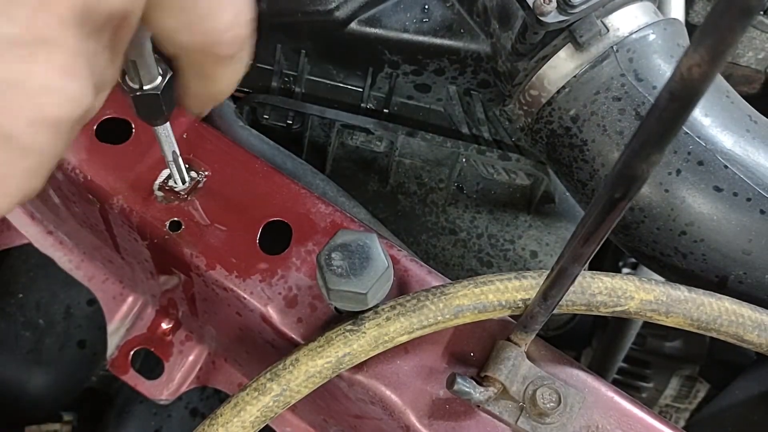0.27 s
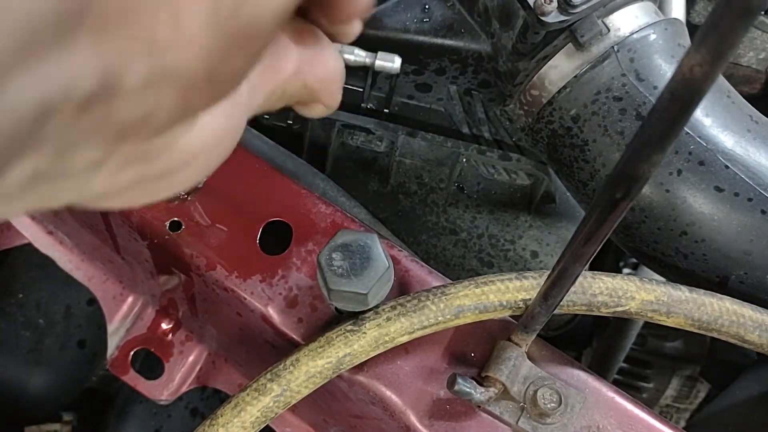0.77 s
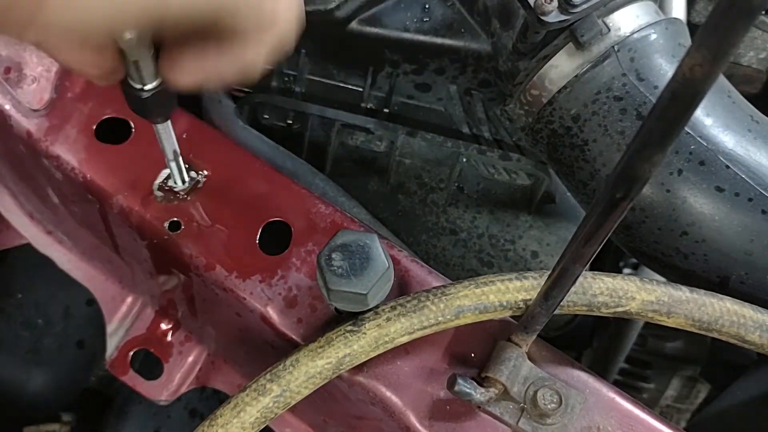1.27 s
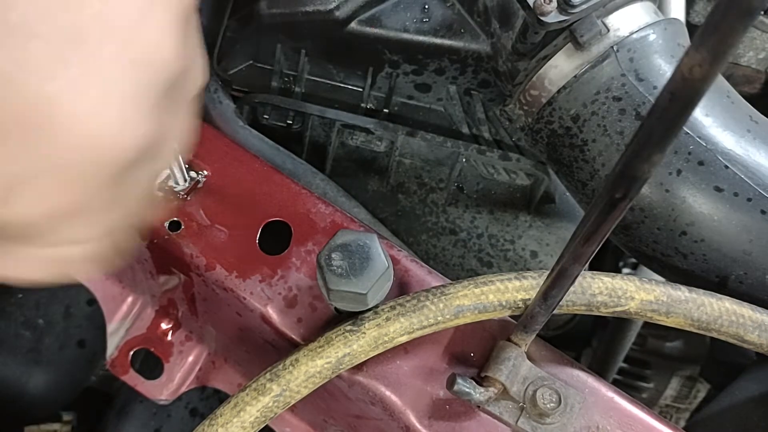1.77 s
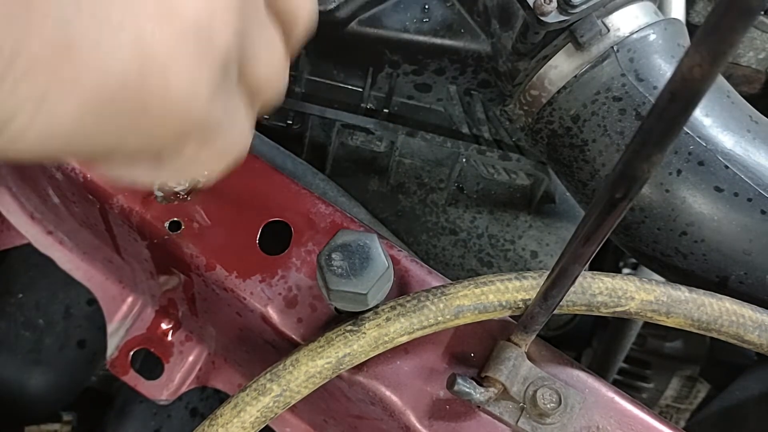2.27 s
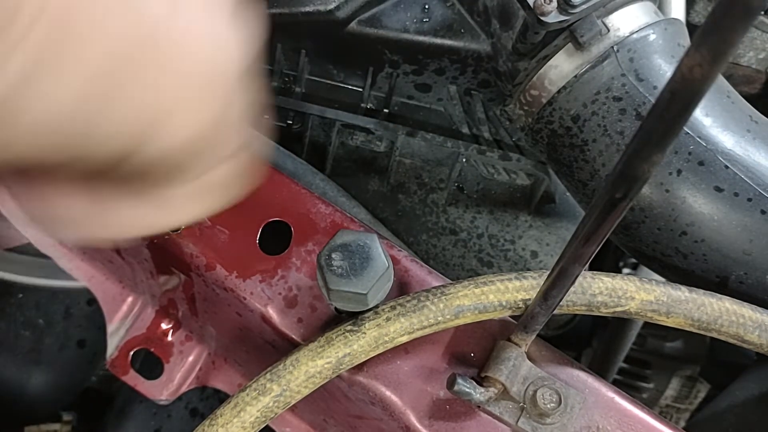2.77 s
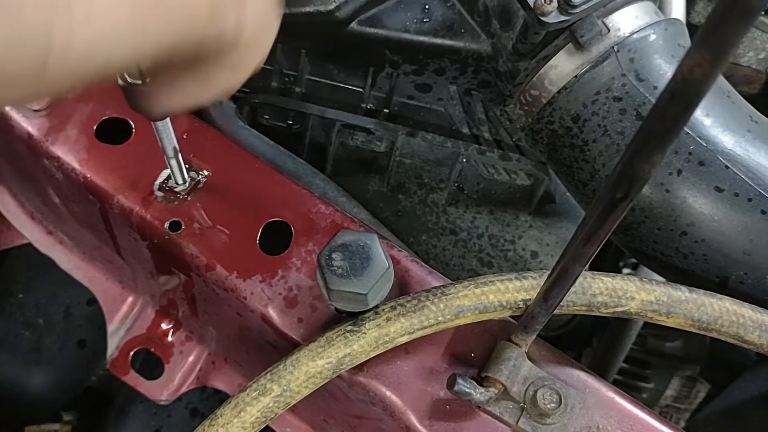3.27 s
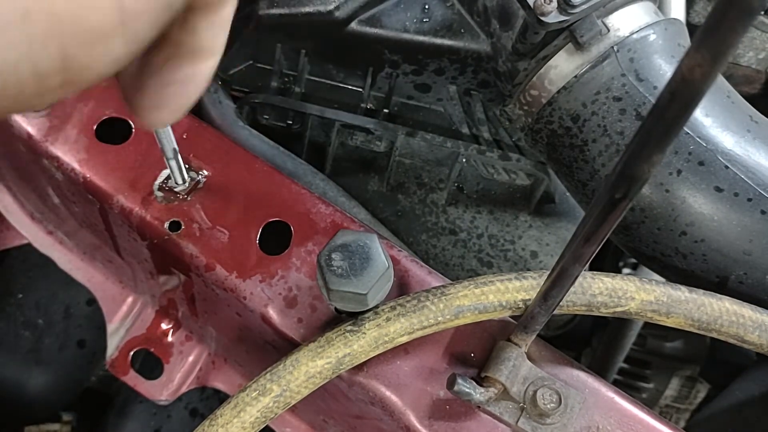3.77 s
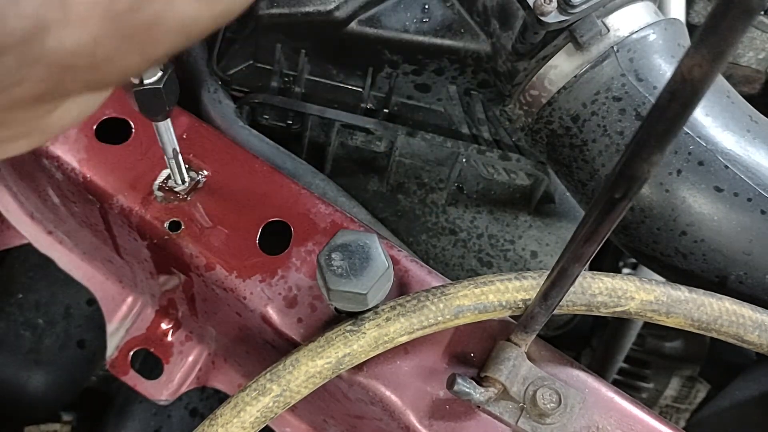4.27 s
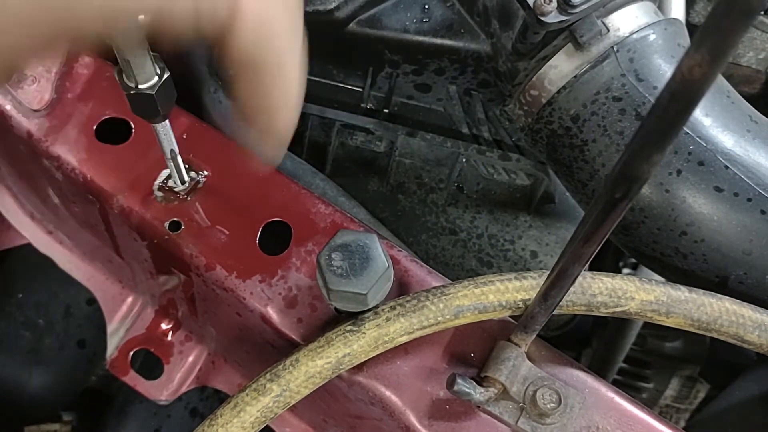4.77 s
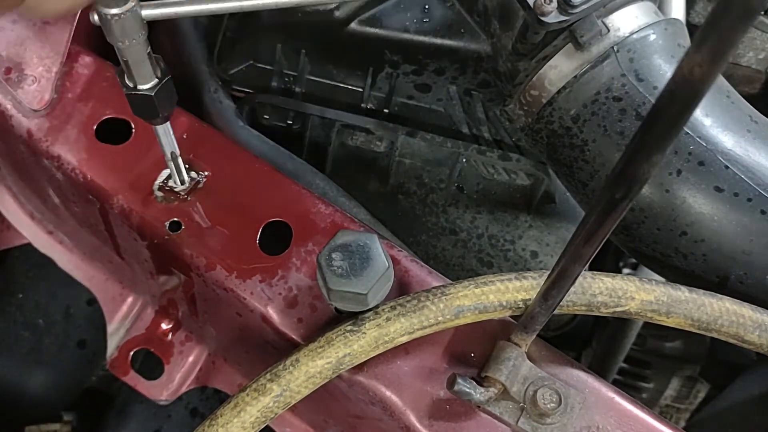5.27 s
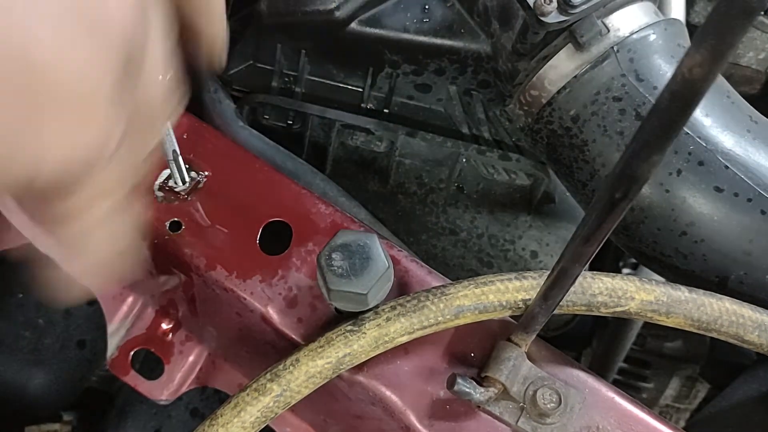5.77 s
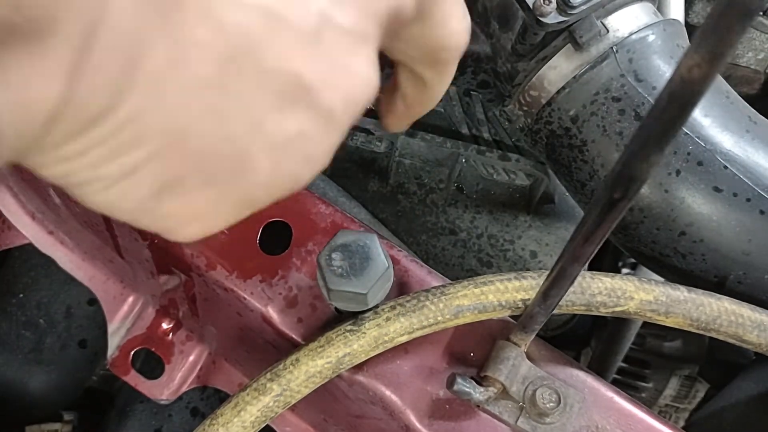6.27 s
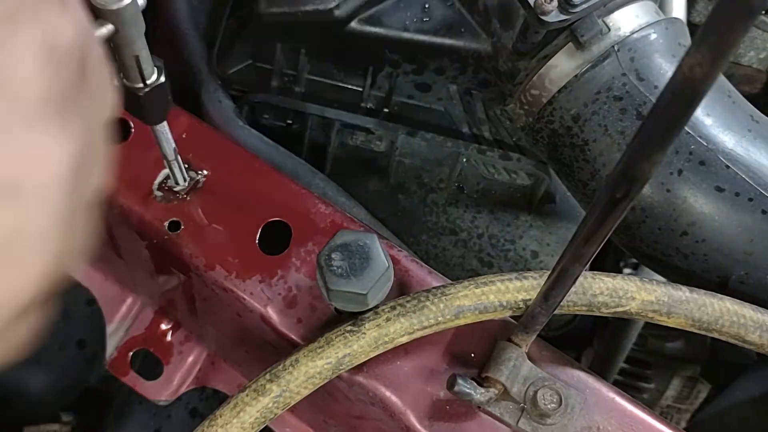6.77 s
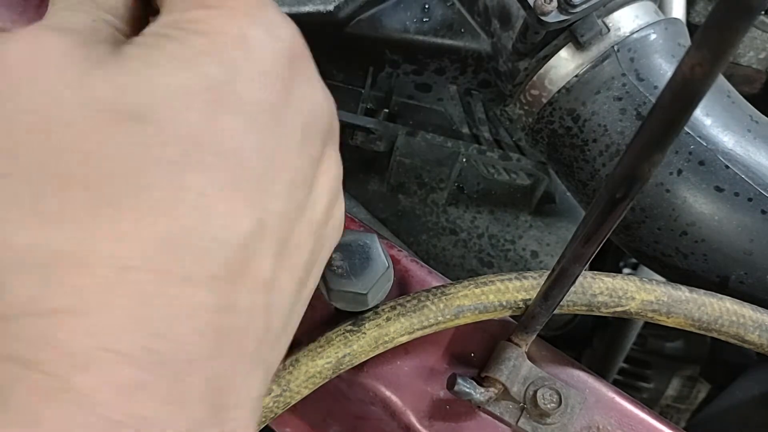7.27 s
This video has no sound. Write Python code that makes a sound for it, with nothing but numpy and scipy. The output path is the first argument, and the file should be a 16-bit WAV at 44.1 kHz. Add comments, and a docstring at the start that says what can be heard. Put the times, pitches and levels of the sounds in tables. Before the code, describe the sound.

Close, irregular metallic clicks and soft hollow sheet-metal knocks from a hand tap being turned, with gritty slides over a distant swelling traffic-like rumble.

```python
"""In a workshop, a hand tap in a T-handle wrench is turned into a car's sheet-metal cross member, heard close up.
The loose handle bar clicks against its stop: short noise bursts through the wrench's steel resonances.
The tap catches and knocks in its hole: a scrape and shank ring in filtered noise, then struck panel modes.
At each new grip the bar slides with a gritty hiss: noise driven by the bar's speed and small random catches.
Behind it a distant rumble, like traffic, swells and fades in coloured noise, over a deep drone and faint hiss."""
import sys
import numpy as np
from scipy import signal
from scipy.fft import rfft, irfft
from scipy.io import wavfile
from scipy.ndimage import uniform_filter1d

SR = 44100
rng = np.random.default_rng(int(sys.argv[2]) if len(sys.argv) > 2 else 0)


def materialize(psi):
    """Save the field psi as 16-bit PCM at rate SR to the path in sys.argv[1].

    A 1-D psi becomes a single channel; in a 2-D psi each row is a channel.
    """
    bounded = np.clip(np.atleast_2d(psi).T, -1, 1)
    quanta = np.round(bounded * 32767).astype(np.int16)
    wavfile.write(sys.argv[1], SR, quanta)


N = 331191  # length in samples
RING = np.arange(20000) / SR  # time axis of one blow, s


# Clicks of the steel handle bar against its stop.
# Each row: start in seconds, relative level in dB, pitch in Hz, brightness in dB.
CLICKS = [(.064, -65.5, 9000, -1), (.547, -23.5, 10200, -16), (1.334, -58, 9100, -17),
          (1.802, -48.5, 9600, -11), (1.878, -53.5, 8400, -12), (2.05, -51, 9000, -3),
          (2.333, -54, 9000, -1), (2.796, -37, 8560, -4), (3.298, -41.5, 8200, -10),
          (3.887, -54.5, 8800, -10), (4.31, -53, 8400, -13), (4.438, -51.5, 8400, -13),
          (4.575, -47.5, 8600, -11), (4.618, -57, 8500, -13), (4.962, -54, 8900, -10),
          (5.012, -38.5, 8600, -0.5), (5.535, -55, 8900, -7), (5.612, -46.5, 8750, -5),
          (6.118, -52.5, 8900, -9), (6.388, -53.5, 9000, -6), (6.812, -38.5, 8250, 1),
          (6.993, -62.5, 8900, -14)]
# Resonances of the steel wrench. Each row: centre in Hz, width in Hz, peak in dB.
WRENCH_RESONANCES = [(3434, 130, 8.5), (3980, 80, 9), (4660, 88, 7.5), (4690, 80, 6), (5070, 72, 11.5),
                     (5676, 130, 9), (6320, 64, 6), (6450, 70, 4), (6810, 40, 8.5), (7610, 140, 9.5),
                     (7860, 45, 9), (8443, 80, 10), (8560, 54, 8.5), (8890, 170, 8), (9260, 49, 9),
                     (9900, 51, 7.5), (10170, 60, 1), (10480, 48, -0.5), (11160, 110, 4), (11100, 90, 8),
                     (14500, 1300, 8)]


def clicks():
    """The bar meets its stop and rebounds once; louder clicks are given a relatively stronger tail."""
    bounce_s, bounce_db = 0.006, -7
    left_over_right_db = 0.1
    out = np.zeros((2, N))
    for start, level_db, hz, bright_db in CLICKS:
        body_db = -17.5 - 0.48 * bright_db  # the brighter a click, the less body it has
        colour = [(500, body_db - 24), (1800, body_db - 10.5), (4500, body_db - 2),
                  (0.65 * hz, body_db / 2 - 5), (hz, 0), (1.17 * hz, -3),
                  (12800, bright_db + 0.5), (15500, bright_db)]
        tail_db = -13.5 + 0.29 * (level_db + 39.5)
        blow = dying(rise=0.0005, t60=0.052, tail_db=tail_db, tail_t60=0.23)
        rebound = gain_of(bounce_db) * np.interp(RING - bounce_s, RING, blow, left=0)
        burst = noise(colour, len(RING)) * np.hypot(blow, rebound) * chatter(depth_db=2.5)
        ring = evened(resonant(burst, WRENCH_RESONANCES), seconds=0.013)
        loudness = gain_of(level_db) * np.hypot(1, gain_of(bright_db))  # bright clicks come out louder
        add(out, start, loudness * ring)
    balance = gain_of([[left_over_right_db / 2], [-left_over_right_db / 2]])
    return out * gain_of(2.1) * balance


# Knocks of the tap in its hole. Each row: start in seconds, relative level in dB,
# pitch of the panel's ring in Hz, hardness from 0 to 1, scrape level in dB.
KNOCKS = [(.43, -53.5, 1054, 0.5, -74), (.547, -43, 1120, 1, -41.5), (0.879, -51.5, 880, 0.12, -85),
          (1.066, -49, 990, .95, -65), (1.229, -54.5, 1000, 0.3, -64.5), (1.471, -42, 890, 0.38, -53),
          (1.686, -44, 1050, 0.82, -49), (2.03, -42, 856, 0.38, -55.5), (2.05, -42.5, 820, 0.5, -52),
          (2.115, -39, 810, 0.17, -51.5), (2.149, -37.5, 695, 0.35, -52.5), (2.2, -46.5, 830, 0.96, -50),
          (2.514, -43.5, 810, 0.41, -58), (2.689, -42.5, 1110, 0.86, -47.5), (2.958, -53.5, 780, .1, -72),
          (3.181, -54, 890, 0.88, -63), (3.211, -53.5, 885, 0.3, -62), (3.494, -55.5, 870, 0.16, -74),
          (3.861, -53.5, 760, .02, -64), (4.08, -49.5, 880, .8, -57), (4.256, -47, 725, 0.1, -61.5),
          (4.69, -50, 810, 0.17, -59), (5.749, -53.5, 910, 0.14, -61.5), (6.386, -46.5, 885, 0.38, -45.5),
          (6.94, -49, 970, 0.28, -57.5), (7.243, -55.5, 990, 0.4, -61), (7.354, -59, 1000, 0.4, -73),
          (7.39, -45.5, 990, 0.29, -58)]
# Ringing modes of the panel. Each row: pitch in Hz, relative level in dB, t60 in seconds.
PANEL_MODES = [(277, -5.5, .3), (394.4, 1.5, .25), (437, 4, 0.28), (590, -2, 0.4), (649.5, 4.5, 0.16),
               (727.5, -4.5, 0.14), (786, -12.5, 0.39), (829, -3.5, 0.13), (914, -8.5, 0.084),
               (968, 0, 0.22), (1000, -3.5, 0.2), (1079, -0.5, 0.2), (1027, -4, 0.23), (1184, -1.5, 0.25),
               (1207, 1.5, 0.11), (1480, -6, 0.19)]
# Resonances of the tap's shank in the panel. Each row: centre in Hz, width in Hz, peak in dB.
SHANK_RESONANCES = [(2000, 130, 3.5), (2467, 140, 13.5), (2880, 230, -8), (3620, 180, 6.5), (4020, 130, 7)]
# Hollow resonances of the engine bay. Each row: centre in Hz, width in Hz, peak in dB.
BAY_RESONANCES = [(120.2, 13, 5.5), (172, 16, 3), (276.6, 13.4, 7.5), (398.5, 22, 7.5), (464.5, 24, 4.5),
                  (646, 34, 5.5), (792, 8, -0.5), (888, 22, 6), (1019, 24, 5.5), (1020, 7.3, -2.5)]
# Colour of the panel's thud. Each row: frequency in Hz, relative level in dB per Hz.
THUD_COLOUR = [(60, -23), (130, -9), (340, -3), (500, -7), (700, -6), (1150, -7), (1350, -15.5),
               (1800, -27), (2600, -18.5), (4000, -29.5), (8000, -63)]
# Colour of the tap's scrape. Each row: frequency in Hz, relative level in dB per Hz.
SCRAPE_COLOUR = [(600, -22.5), (1800, -16.5), (3000, -4), (5500, 3), (9000, 3.5), (10500, -4), (14000, -8),
                 (16000, -17.5)]
# Softest and hardest knock, as a pair: rise in seconds.
KNOCK_RISE_S = (0.01, .0008)
# Softest and hardest knock, as a pair: shank level in dB relative to the knock.
SHANK_DB = (-20, -1.5)
# Softest and hardest knock, as a pair: centre of the shank's ring in Hz.
SHANK_HZ = (2240, 2690)


def knocks():
    """The tap catches: scrape first, then the shank's ring, then the panel's slower bending waves."""
    out = np.zeros((2, N))
    for start, level_db, panel_hz, hardness, scrape_db in KNOCKS:
        # A harder knock rises faster and rings the shank louder and higher.
        rise = np.exp(np.interp(hardness, [0, 1], np.log(KNOCK_RISE_S)))
        shank_db = level_db + np.interp(hardness, [0, 1], SHANK_DB)
        shank_hz = np.interp(hardness, [0, 1], SHANK_HZ)

        scrape = noise(SCRAPE_COLOUR, len(RING)) * dying(rise, t60=0.044, tail_db=-17, tail_t60=0.18)
        scrape = resonant(scrape * chatter(depth_db=2.5), WRENCH_RESONANCES)
        add(out, start, gain_of(scrape_db) * evened(scrape, seconds=0.017))

        band = [(0.31 * shank_hz, -25), (0.96 * shank_hz, -4), (shank_hz, 0),
                (1.02 * shank_hz, -8), (3.0 * shank_hz, -26), (16000, -50)]
        shank = noise(band, len(RING)) * dying(rise, t60=0.17, tail_db=-20, tail_t60=0.61)
        shank = resonant(shank, SHANK_RESONANCES)
        add(out, start + 0.00082, gain_of(shank_db) * evened(shank, seconds=0.039))

        thud = noise(THUD_COLOUR, len(RING)) * dying(rise + 0.0055, t60=0.13, tail_db=1.5, tail_t60=0.3)
        thud = evened(resonant(thud, BAY_RESONANCES), seconds=0.04)
        ring = modes(PANEL_MODES, panel_hz, octaves=0.31, rise=rise + 0.00084, uneven_db=1.5)
        panel = gain_of(-2.0) * ring + gain_of(-3.5) * thud
        add(out, start + 0.00101, gain_of(level_db) * panel)
    return out


# Slides of the handle bar, one at each new grip.
# Each row: start in seconds, length in seconds, relative level in dB.
SLIDES = [(1.156, 0.32, -60), (1.72, .24, -56.5), (2.231, 0.22, -56.5), (2.724, 0.2, -55),
          (3.182, 0.26, -56), (3.747, 0.25, -59), (4.503, 0.16, -51.5), (4.927, 0.28, -58.5),
          (5.455, 0.26, -58.5), (6.054, 0.23, -57), (6.642, 0.22, -62.5)]
# Colour of the sliding hiss. Each row: frequency in Hz, relative level in dB per Hz.
HISS_COLOUR = [(1000, -20), (3500, -10), (5500, -2), (8500, 4), (11000, 1.5), (13000, -5), (15500, -10)]


def slides():
    """The bar hisses through the wrench, louder with speed, ticking over small catches on its surface."""
    fastest_share = 0.37  # the bar speeds up for this share of a slide, then slows
    catches_per_s, catch_spread_db = 200, 4
    smooth_share = 0.19  # share of the direct hiss power free of catches
    t = np.arange(N) / SR
    speed = np.zeros(N)
    for start, length, level_db in SLIDES:
        speed += gain_of(level_db) * np.interp((t - start) / length, [0, fastest_share, 1], [0, 1, 0])
    strength = gain_of(catch_spread_db * np.minimum(rng.exponential(1, N), 2.5))
    catches = (rng.random(N) < catches_per_s / SR) * strength
    grit = signal.oaconvolve(catches ** 2, np.exp(-RING / 0.0025))[:N].clip(0)
    power = speed ** 2 * (smooth_share + (1 - smooth_share) * grit / grit.mean())
    tail = gain_of(-120 * RING / 0.16)  # as power: 60 dB down in 0.16 s
    power += 0.62 * signal.oaconvolve(power, tail / tail.sum())[:N].clip(0)  # the bay carries the hiss on
    hiss = evened(resonant(noise(HISS_COLOUR, N), WRENCH_RESONANCES))
    return gain_of(-2.5) * np.sqrt(power) * hiss


# Colour of the distant rumble. Each row: frequency in Hz, relative level in dB per Hz.
RUMBLE_COLOUR = [(50, -30.5), (80, -13), (110, 1), (180, -1), (250, -3), (340, -18.5), (600, -27.5),
                 (1100, -19), (1500, -19), (2500, -30.5), (4000, -37.5), (9000, -55.5)]
# Colour of the distant roar. Each row: frequency in Hz, relative level in dB per Hz.
ROAR_COLOUR = [(100, -19), (280, -1.5), (340, -0.5), (420, -0.5), (520, -1.5), (650, -2.5), (1080, -2.5),
               (1260, -13), (1800, -26), (2450, -19), (3200, -26), (6000, -36)]
# Colour of the room's deep drone. Each row: frequency in Hz, relative level in dB per Hz.
DEEP_COLOUR = [(20, -18), (32, -9), (46, -17), (65, 1.5), (80, 7.5), (100, -8), (140, -15), (300, -45)]
# Colour of the place's faint hiss. Each row: frequency in Hz, relative level in dB per Hz.
AIR_COLOUR = [(300, -2), (1500, -0.5), (3000, -0.5), (5000, -1), (8500, 0.5), (11000, -7.5), (14000, -11.5),
              (16000, -14)]
# Loudness of the faint hiss over time. Each row: time in seconds, level in dB.
AIR_LEVEL = [(1, -73), (2.3, -72.5), (3.8, -67.5), (7.5, -67.5)]


def background():
    """Rumble and roar swell and fade in the hollow engine bay, over the room's deep drone and a faint hiss."""
    t = np.arange(N) / SR
    rumble_db, roar_db = traffic(t)
    deep = gain_of(-60.5 + 0.5 * (rumble_db + 58)) * noise(DEEP_COLOUR, N)  # the drone swells less
    rumble = evened(resonant(noise(RUMBLE_COLOUR, N), BAY_RESONANCES))
    rumble = rumble * gain_of(rumble_db + 1.0) * waver(depth_db=1.5, seconds=0.11)
    roar = evened(resonant(noise(ROAR_COLOUR, N), BAY_RESONANCES))
    roar = roar * gain_of(roar_db + 2.0) * waver(depth_db=1.2, seconds=0.04)
    air = gain_of(np.interp(t, *np.transpose(AIR_LEVEL))) * noise(AIR_COLOUR, N)
    return deep + rumble + roar + air


# Distant vehicles going by. Each row: nearest moment in seconds, time to pass in seconds,
# relative rumble level in dB, relative roar level in dB.
PASSES = [(2.15, 0.57, -48.5, -53), (4.3, 0.53, -59, -55)]


def traffic(t):
    """Relative rumble and roar in dB: each vehicle nears and recedes over a slowly fading bed."""
    falloff = 1.73  # how steeply a pass fades with distance
    far_rumble_db = -57.5 - 0.84 * t  # traffic farther off, fading in dB per second
    far_roar_db = -60.5 - 1.11 * t
    power = gain_of([far_rumble_db, far_roar_db]) ** 2
    for nearest, seconds, rumble_db, roar_db in PASSES:
        distance = np.hypot(1, (t - nearest) / seconds)
        power = power + (gain_of([[rumble_db], [roar_db]]) / distance ** falloff) ** 2
    return 10 * np.log10(power)


def dying(rise, t60, tail_db, tail_t60):
    """Envelope of a blow: quick rise, fast fall, then a slower tail."""
    fall = np.hypot(gain_of(-60 * RING / t60), gain_of(tail_db - 60 * RING / tail_t60))
    return (1 - np.exp(-(RING / rise) ** 2)) * fall


def modes(table, centre_hz, octaves, rise, uneven_db):
    """Struck modes as dying sines, strongest near centre_hz, uneven from blow to blow, phased per channel."""
    hz, db, t60 = np.transpose(table)[:, :, None]
    phase, apart, luck = rng.uniform(-0.74, 1, (3, len(hz), 1))
    apart = apart * np.sqrt(np.clip(1 - read(SAME, hz), 0, 1))
    focus = 1 / (1 + (np.log2(hz / centre_hz) / octaves) ** 2)
    size = gain_of(db + uneven_db * luck - 60 * RING / t60) * focus
    ring = np.array([(size * np.sin(2 * np.pi * hz * RING + np.pi * p)).sum(0)
                     for p in (phase, phase + apart)])
    return evened(ring * (1 - np.exp(-RING / rise)), seconds=0.069)


def chatter(depth_db):
    """Steel on steel makes and breaks contact many times within one blow: a fast random level."""
    return gain_of(depth_db * evened(uniform_filter1d(rng.standard_normal(len(RING)), size=30)))


def waver(depth_db, seconds):
    """A random swell and sag in level, with a new target every so many seconds."""
    knots = np.arange(0, N / SR + seconds, seconds)
    return gain_of(depth_db * np.interp(np.arange(N) / SR, knots, rng.standard_normal(len(knots))))


def resonant(x, table):
    """Passes a sound through a set of resonances, which ring on after it (minimum phase)."""
    hz = np.fft.rfftfreq(16384, 1 / SR)
    db = sum(peak_db / (1 + ((hz - f) / (width / 2)) ** 2) for f, width, peak_db in table)
    log_gain = np.log(gain_of(np.r_[db, db[-2:0:-1]]))
    ring = np.fft.ifft(np.exp(np.conj(signal.hilbert(log_gain)))).real
    return signal.oaconvolve(x, ring[None], axes=1)[:, :x.shape[1]]


# Left-right likeness of the diffuse sound. Each row: frequency in Hz, correlation from 0 to 1.
SAME = [(40, 0.88), (90, 1), (180, 0.92), (350, 0.78), (700, 0.33), (1400, 0), (3000, 0), (16000, 0.039)]


def noise(spectrum, size):
    """Stereo noise of a given colour, near mono in the bass."""
    hz = np.fft.rfftfreq(size, 1 / SR)
    a, b = rfft(rng.standard_normal((2, size)))
    same = np.clip(read(SAME, hz), -1, 1)
    pair = np.array([a, same * a + np.sqrt(1 - same ** 2) * b])
    return evened(irfft(pair * gain_of(read(spectrum, hz)), size))


def read(points, hz):
    """Reads a rising-frequency table on a log-frequency axis."""
    f, value = np.transpose(points)
    return np.interp(np.log(hz + 1), np.log(f + 1), value)


def gain_of(db):
    """Turns dB into an amplitude factor."""
    return 10 ** (np.asarray(db) / 20)


def evened(x, seconds=None):
    """Scales to rms 1, over the whole sound or over its first moments."""
    head = x if seconds is None else x[..., :round(seconds * SR)]
    return x / np.sqrt(np.mean(head ** 2) + 1e-20)


def add(mix, s, sound):
    """Adds a stereo sound at time s."""
    part = mix[:, max(round(s * SR), 0):][:, :sound.shape[1]]
    part += sound[:, :part.shape[1]]


def scene():
    """Wrench, panel and workshop together."""
    return clicks() + knocks() + slides() + background()


def record(dry):
    """Band limit: a steep low-pass at 16 kHz."""
    low_pass = signal.firwin(255, 16000, window=("kaiser", 9), fs=SR)
    return signal.oaconvolve(dry, low_pass[None], "same")


dry = scene()
out = record(dry)
materialize(out)
```